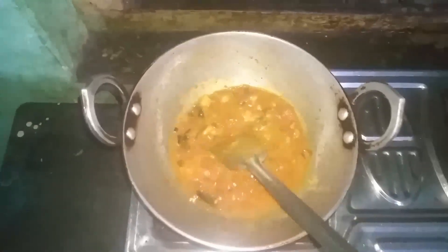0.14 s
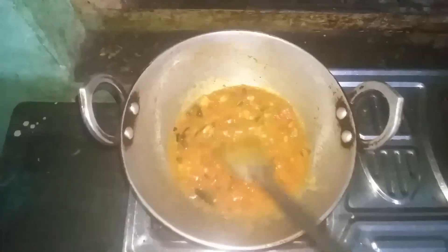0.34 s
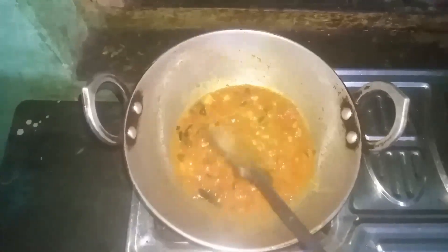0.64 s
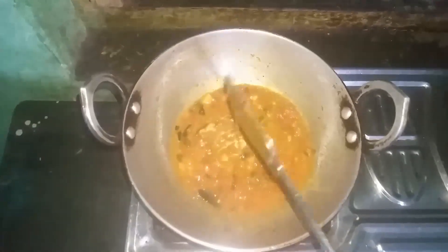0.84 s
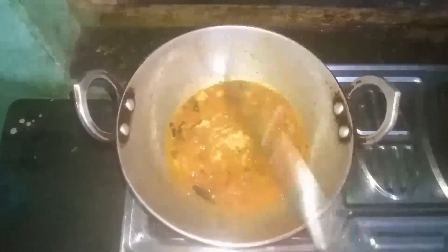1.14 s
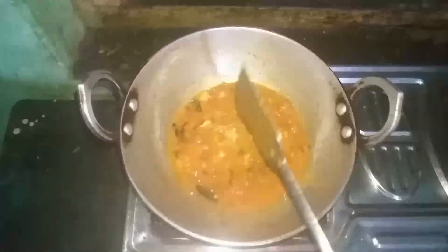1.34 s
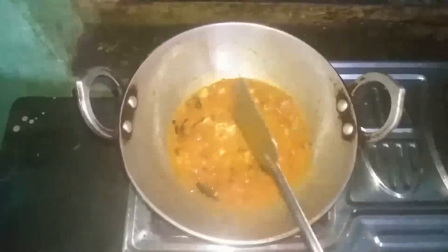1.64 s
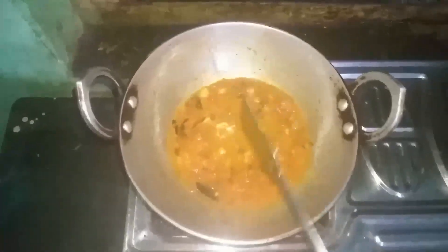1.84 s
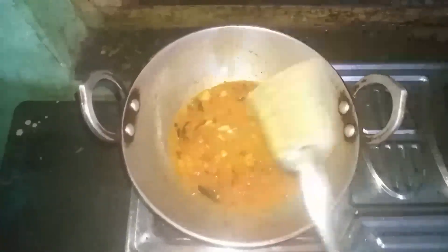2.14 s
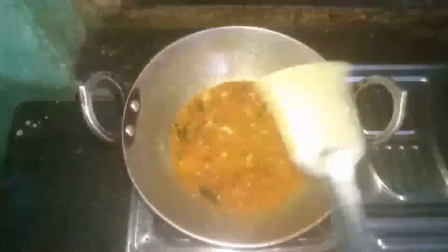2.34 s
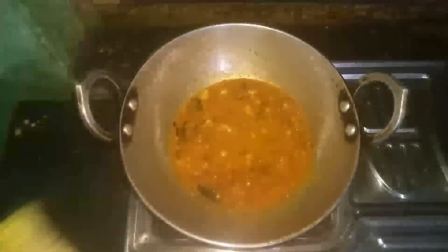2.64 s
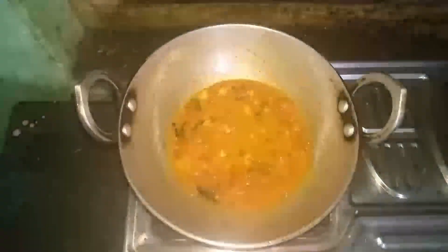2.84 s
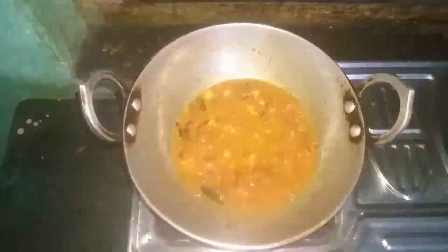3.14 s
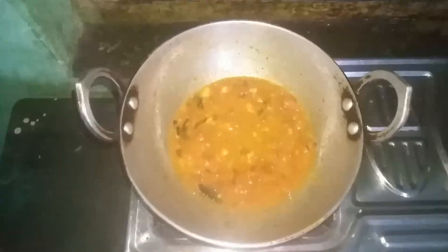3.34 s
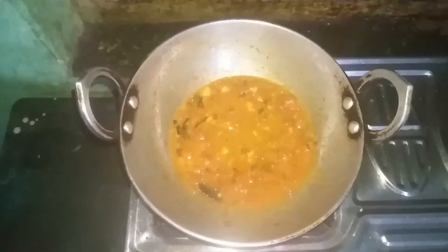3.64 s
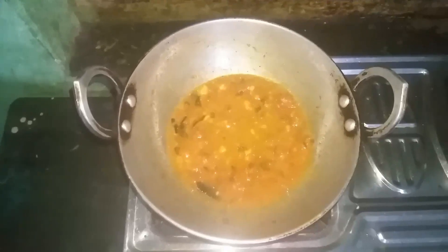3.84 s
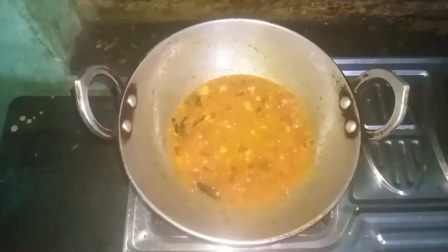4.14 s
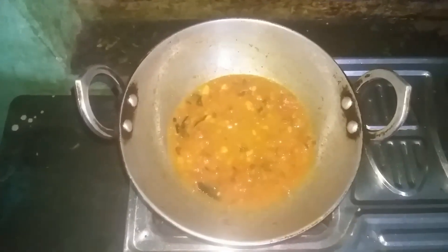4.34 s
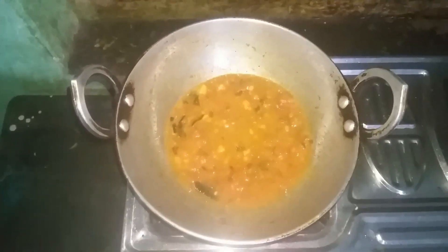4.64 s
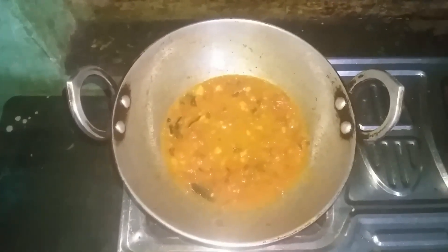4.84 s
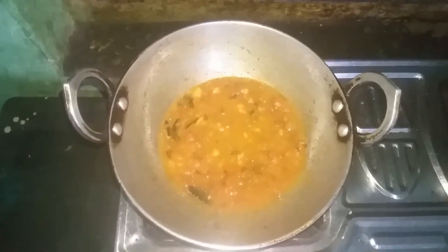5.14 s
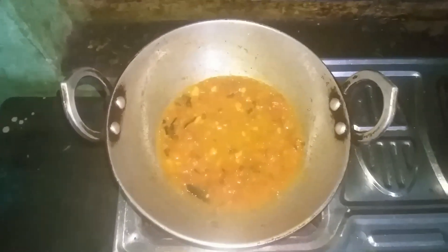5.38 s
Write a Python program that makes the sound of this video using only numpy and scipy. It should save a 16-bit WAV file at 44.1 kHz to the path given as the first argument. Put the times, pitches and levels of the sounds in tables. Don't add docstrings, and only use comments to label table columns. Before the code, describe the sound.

Close above a steel pan in a small hard-walled kitchen, gravy sizzles, crackles and spits fat. A spatula scrapes the pan for the first half second, faint dishes clink far off, then near four seconds the spatula lands on the worktop with a light tap, a very loud clack and a bounce. The simmer grows fuller with soft plops over a steady low motor hum.

```python
import sys
import numpy as np
from scipy import signal
from scipy.fft import rfft, irfft
from scipy.io import wavfile

SR = 44100
rng = np.random.default_rng(int(sys.argv[2]) if len(sys.argv) > 2 else 0)


def digitize_waveform(pressure):
    field = np.atleast_2d(pressure).T
    bounded = np.clip(field, -1, 1)
    quanta = np.round(bounded * 32767).astype(np.int16)
    wavfile.write(sys.argv[1], SR, quanta)


def gain_from_db(level_db):
    decades = np.asarray(level_db, float) / 20
    return 10 ** decades


N = 242991

# time in seconds, sizzle level in dB.
VIGOUR = [(0, -46.5), (.38, -51.5), (.8, -55.5), (1.1, -51.5), (1.5, -52.5), (1.65, -49.5), (2.04, -47),
          (2.73, -48.5), (3.3, -47.5), (3.9, -45.5), (4.5, -44.5), (4.9, -45), (5.3, -43.5), (5.51, -46.5)]
# frequency in Hz, density in dB per Hz.
SIZZLE_SPECTRUM = [(710, -52), (1200, -48), (1430, -47), (1590, -14.5), (2010, -9), (3060, 3), (3350, -3),
                   (3770, 3), (4120, -1), (4600, 0), (4940, -5), (5410, -3.5), (6550, -9.5), (7780, -8),
                   (10500, -37), (13600, -57), (22000, -120)]
# frequency in Hz, density in dB per Hz.
SPRAY_SPECTRUM = [(8500, -0.5), (9700, -17.5), (10800, -17.5), (12300, -17), (13800, -23), (16000, -22)]
# frequency in Hz, density in dB per Hz.
GURGLE_SPECTRUM = [(240, -32), (400, -16), (600, -12), (974, -6), (1260, -10), (1580, -1.5), (1700, 1),
                   (2210, -19), (3740, -120)]
# middle in seconds, length in seconds, extra level in dB.
GUSTS = [
    (.82, 0.18, 5.5),
    (1.6, 0.37, 5.5),
    (2.46, 0.16, 7.5),
    (2.92, 0.13, 2),
    (3.5, 0.11, 0.5),
    (4.8, 0.19, 0.5),
    (5.45, 0.89, 3.5),
]
# middle in seconds, length in seconds, level in dB.
PLOPS = [
    (3.75, .5, -78),
    (4.485, 1, -60.5),
    (4.816, 0.19, -61),
    (5.09, 0.16, -62),
    (5.397, 0.62, -63),
]
# time in seconds, peak in dB, pitch in Hz, snap level in dB.
SPITS = [(0.0598, -27, 2580, -19), (0.5367, -30.5, 3660, -17), (1.1078, -33, 4600, -18),
         (1.2425, -32, 3000, -26), (1.392, -34, 3920, -12), (1.5267, -29.5, 4060, -14),
         (1.6186, -32, 3880, -12), (1.6993, -32.5, 3800, -15), (1.8466, -25, 3110, -26),
         (2.0034, -32, 2880, -14), (2.038, -26, 3740, -21), (2.2427, -28, 3050, -23),
         (2.39, -27, 3720, -18), (2.4776, -29, 2980, -11), (2.9054, -31, 3890, -15),
         (3.244, -30.5, 4500, -13), (3.3927, -25.5, 3620, -22), (3.4252, -25, 3600, -16),
         (3.5084, -24.5, 3520, -30), (3.5538, -29, 2870, -20), (3.6536, -27, 2920, -21),
         (3.674, -41, 3500, -22), (3.7819, -26.5, 2960, -23), (4.6523, -24, 4230, -21),
         (4.79, -25.5, 3100, -15), (5.0574, -26, 3660, -15), (5.0786, -23.5, 3150, -23),
         (5.3364, -28, 4680, -21), (5.4192, -33, 4320, -21), (5.442, -29, 4520, -15)]
# time in seconds, peak in dB, pitch in Hz.
TICKS = [(0.808, -42, 7200), (1.284, -42, 5530), (1.4117, -39, 7900), (1.4528, -38, 7900),
         (1.5279, -37, 7180), (1.6187, -32, 7900), (1.7123, -36, 7970), (1.8891, -49, 6200),
         (1.924, -41, 7040), (1.9395, -49, 6150), (2.412, -38, 5550), (2.4404, -43, 5460),
         (2.4567, -30, 5700), (2.734, -32, 5570), (2.9058, -46, 7250), (3.4445, -37, 8100),
         (4.5146, -32, 5910), (4.5985, -36.5, 7540), (4.6384, -39, 5500), (4.811, -29.5, 6360),
         (5.057, -36, 5510), (5.355, -39, 5550), (5.4707, -32, 6800)]
# time in seconds, peak in dB, pitch in Hz, 60 dB decay in seconds.
WHEEZES = [
    (3.163, -35, 7700, 0.046),
    (4.765, -36, 6900, .04),
    (5.18, -36, 7600, 0.087),
    (5.44, -30.5, 5200, 0.047),
    (6.6, -36, 4730, 0.031),
    (6.2, -42, 3800, 0.04),
    (.805, -56, 12800, .07),
]
# time in seconds, peak in dB, rattle in dB, softness from 0 to 1.
BLOWS = [(3.8851, -20.5, -30, 0.44), (3.889, -19, -13, 0.17), (3.8945, -21.5, -24, 0.5),
         (4.0848, 0, -42, 1), (4.0868, -6.5, -13.5, 0), (4.0905, -5, -22.5, 0.02),
         (4.0944, -12.5, -29, 0.05), (4.1050, -9.5, -12, 0), (4.2733, -19.5, -35, 0.8),
         (4.2743, -12.5, -22, 0.76), (4.279, -19, -33, .6), (4.2898, -17.5, -22, 0.87),
         (4.292, -10, -30, 1), (4.295, -11.5, -15.5, 0.59), (4.3, -10.5, -21, 0.83),
         (4.3026, -15.5, -20, 0.67), (4.3064, -17.5, -19, 0.6)]
# frequency in Hz, level in dB, 60 dB decay in seconds.
HANDLE_MODES = [(2300, -11, .03), (2700, -7.5, 0.0098), (3050, -10.5, 0.016), (4720, -10, .025),
                (8050, -11, 0.022)]
# frequency in Hz, level in dB, 60 dB decay in seconds.
BLADE_MODES = [(2300, -39, 0.016), (2485, -7, 0.065), (2614, -9.5, 0.029), (2820, -9, 0.011),
               (3095, -5.5, 0.017), (3300, -21, .015), (3700, -22, 0.022), (3974, -9.5, 0.023),
               (4390, -13, 0.023), (4650, -13, 0.023), (5140, -21, .015), (6050, -14, 0.019),
               (7020, -14, 0.028), (7550, -16.5, 0.024)]
# frequency in Hz, density in dB per Hz.
HANDLE_CRACK = [(1300, -37), (1800, -14), (2200, 0), (3000, 1.5), (3600, -17), (4600, 1), (5200, -16),
                (6300, -16), (8100, -7.5), (9600, -38), (10900, -22), (13000, -22), (13800, -48),
                (16000, -45)]
# frequency in Hz, density in dB per Hz.
BLADE_CRACK = [(1300, -18.5), (1600, -21.5), (2100, -19), (2450, -3), (3100, 4), (3550, 4.5), (4000, 6.5),
               (4700, 4.5), (5500, -5.5), (6200, -6), (7300, -4.5), (8500, -3.5), (9600, -22.5),
               (15600, -45)]
# frequency in Hz, density in dB per Hz.
WORKTOP_THUD = [(110, -62), (190, -20), (238, 2), (345, 0), (654, -11), (1180, -7), (1280, 2.5),
                (1500, -37), (1950, -35), (3300, -120)]
# time in seconds, level in dB.
SCRAPE_LEVEL = [(0, -52), (.05, -50), (.075, -46), (.16, -46.5), (.3, -52), (.42, -55), (.55, -64)]
# frequency in Hz, width in Hz, level in dB.
PAN_MODES = [(114, 12, -2), (400, 89, -8), (473, 97, -11), (1150, 58, -11), (1247, 54, -5),
             (1570, 70, -6.5), (1870, 110, -6), (2130, 52, 5), (2484, 60, 0.5), (2490, 55, 3)]
# frequency in Hz, density in dB per Hz.
RUMBLE_SPECTRUM = [(12, -60), (20, -33), (64, -38), (101, -14.5), (127, -17.5), (157, -10.5), (184, -19),
                   (212, -15), (274, -17.5), (330, -15), (359, -21), (397, -30.5), (600, -36), (780, -70),
                   (1320, -120)]
# start in seconds, end in seconds, frequency in Hz, level in dB.
CLINKS = [
    (0.71, 0.82, 1740, -65.5),
    (.86, 1.05, 1670, -68.5),
    (1.092, 1.293, 1203, -62.5),
    (1.18, 1.275, 737, -76),
    (1.364, 1.462, 1690, -61.5),
    (1.417, 1.6, 1636, -65),
    (1.37, 1.503, 1580, -65),
    (1.446, 1.66, 1176, -67),
    (1.462, 1.64, 1060, -72),
    (2.43, 2.65, 1612, -64.5),
]
# frequency in Hz, 60 dB decay in seconds.
ROOM_DECAY = [(300, 1), (2500, 0.43), (6000, 0.79), (12000, 0.22)]


def rms_one(x):
    return x / np.sqrt(np.mean(x ** 2) + 1e-20)


def in_time(rows):
    s, *columns = np.transpose(rows)
    return [np.interp(np.arange(N) / SR, s, c, right=c[-1] if s[-1] > 5 else -120) for c in columns]


def at_hz(points, hz):
    table = np.array(points)
    return np.interp(np.log(hz), np.log(table[:, 0]), table[:, 1])


def swells(rows):
    t = np.arange(N) / SR
    return sum(height * np.cos(np.pi * np.clip((t - s) / length, -.5, .5)) ** 2 for s, length, height in rows)


def colour(x, spectrum):
    hz = np.maximum(np.arange(4097) * SR / 8192, 5)
    low, high = spectrum[0][0], spectrum[-1][0]
    outside_octaves = np.abs(np.log2(hz / np.clip(hz, low, high)))
    cepstrum = irfft(np.log(gain_from_db(at_hz(spectrum, hz) - 24 * outside_octaves)))
    cepstrum[1:4096] *= 2
    cepstrum[4097:] = 0
    response = irfft(np.exp(rfft(cepstrum)))
    return signal.fftconvolve(x, response / np.sqrt(np.sum(response ** 2)))[:N]


def drift(rate):
    r = np.exp(-40 * np.pi * rate / SR)
    slow = signal.lfilter([1], [1, -2 * r, r * r], rng.standard_normal(N // 20 + 4002))[4000:]
    return np.interp(np.arange(N) / 20, np.arange(len(slow)), rms_one(slow))


def ring(clicks, hz, t60):
    r, w = gain_from_db(-60 / (t60 * SR)), 2 * np.pi * hz / SR
    return signal.lfilter([0, np.sin(w)], [1, -2 * r * np.cos(w), r * r], clicks + 1e-18)


def clicks_at(times, heights):
    out = np.zeros(N)
    out[np.round(np.asarray(times) * SR).astype(int)] = heights
    return out


def bursts(per_s, spread_db, clump_db):
    sizes = gain_from_db(spread_db * np.minimum(rng.exponential(1, N), 5)) * rng.choice([-1, 1], N)
    return sizes * (rng.random(N) < per_s * gain_from_db(clump_db * drift(25.0)) / SR)


def bubbles(low_hz, high_hz, per_s, cycles, spread_db):
    clicks, dealt = bursts(per_s, spread_db, 3.0), rng.integers(0, 24, N)
    pitches = np.geomspace(low_hz, high_hz, 24)
    return rms_one(sum(ring(clicks * (dealt == k), hz, cycles / hz) * hz for k, hz in enumerate(pitches)))


def simmer():
    sizzle_db, gust_db = in_time(VIGOUR)[0], swells(GUSTS)
    swing_db = sizzle_db + 50
    thick = np.clip((np.arange(N) / SR - 3.2) / .4, 0, 1)
    fizz_db = -60 + 0.47 * swing_db + 0.94 * gust_db
    spray_db = -65 + 0.92 * swing_db + gust_db
    gurgle_db = -70 + 0.84 * swing_db + 5 * thick
    crackle = rms_one(bursts(900.0, 4.6, 2.5))
    steam = rng.standard_normal((3, N))
    mix = bubbles(1244, 11000, 3500.0, 11.0, 3.3) + gain_from_db(-20.0) * crackle + gain_from_db(2.0) * steam[0]
    mix = mix + gain_from_db(-11.5) * bubbles(1992, 9030, 500.0, 80.0, 2.0)
    pan = colour(mix, SIZZLE_SPECTRUM)
    sizzle = signal.sosfiltfilt(signal.butter(2, 5500, fs=SR, output="sos"), pan)
    spray = colour(steam[1] + gain_from_db(-9) * crackle, SPRAY_SPECTRUM)
    gurgle = colour(steam[2] + gain_from_db(-20.0) * crackle, GURGLE_SPECTRUM)
    flicker_db = 1.47 * drift(17.0)
    large = gain_from_db(sizzle_db + flicker_db) * rms_one(sizzle)
    small = gain_from_db(fizz_db + flicker_db) * rms_one(pan - sizzle)
    fine = gain_from_db(spray_db + 1.8 * drift(36.0)) * rms_one(spray)
    low = gain_from_db(gurgle_db + 1.2 * drift(11.0)) * rms_one(gurgle)
    return large + small + fine + low


def plops():
    hollow = bubbles(800, 1100, 400.0, 30.0, 3.3)
    spells = swells([(s, length, gain_from_db(level_db)) for s, length, level_db in PLOPS])
    return spells * signal.sosfilt(signal.butter(2, [650, 1300], "band", fs=SR, output="sos"), hollow)


def spits():
    rows, out = np.array(SPITS), np.zeros(N)
    t, decay_cycles = np.arange(900) / SR, 23
    for s, peak_db, hz, _ in rows:
        at = round(s * SR)
        envelope = gain_from_db(-60 * t * hz / decay_cycles) * (1 - np.exp(-t / 0.00011))
        shape = np.sin(2 * np.pi * hz * t) * envelope
        out[at:at + 900] += (gain_from_db(peak_db + 0.5) * shape)[:N - at]
    out = signal.sosfilt(signal.butter(4, 1500, "high", fs=SR, output="sos"), out)
    snaps = clicks_at(rows[:, 0], gain_from_db(rows[:, 1] + 19 + rows[:, 3]))
    return out + colour(snaps, SIZZLE_SPECTRUM)


def ticks():
    out, t = np.zeros(N), np.arange(3000) / SR
    droplets = [(s, db - 1.5, hz, 0.0045) for s, db, hz in TICKS]
    for s, peak_db, hz, t60 in droplets + list(WHEEZES):
        at = round(s * SR)
        swell = 1 - np.exp(-t / (0.1 * t60))
        puff = rng.standard_normal(3000) * swell * gain_from_db(-60 * t / np.clip(t60, .001, .09))
        shape = ring(puff, hz, 37.0 / hz)
        out[at:at + 3000] += (gain_from_db(peak_db) * shape / np.abs(shape).max())[:N - at]
    return signal.sosfilt(signal.butter(2, [3000, 11500], "band", fs=SR, output="sos"), out)


def spatula():
    contact, rattle, t = np.zeros(N), np.zeros(N), np.arange(12000) / SR
    chatter_t60_s, rattle_t60_s = 0.012, 0.29
    for s, peak_db, rattle_db, soft in BLOWS:
        at, share = round(s * SR), np.clip(soft, 0, .9)
        dull = signal.lfilter([1 - share], [1, -share], rng.standard_normal((2, 12000)))
        chatter = gain_from_db(peak_db - 60 * t / chatter_t60_s) * (1 - np.exp(-t / 0.00038))
        contact[at:at + 12000] += chatter * dull[0]
        rattle[at:at + 12000] += gain_from_db(peak_db + rattle_db - 60 * t / rattle_t60_s) * dull[1]
    s, peak_db, _, soft = np.transpose(BLOWS)
    first, struck = np.arange(N) < 4 * SR, 0
    for modes, part in (HANDLE_MODES, first), (BLADE_MODES, ~first):
        for hz, level_db, t60 in modes:
            softened_db = 45 * soft * np.log2(max(hz / 3300, 1))
            strikes = clicks_at(s, gain_from_db(peak_db + 3 * rng.standard_normal(len(s)) - softened_db))
            drive = part * (signal.lfilter([.5, .5], 1, strikes) + gain_from_db(-15.5) * rattle)
            struck = struck + gain_from_db(level_db) * ring(drive, hz, np.clip(t60, .008, .035))
    struck = signal.sosfilt(signal.butter(6, 2200, "high", fs=SR, output="sos"), struck)
    struck = struck + gain_from_db(-30) * ring(~first * (contact + gain_from_db(-6) * rattle), 2470, .25) / 10
    dense = contact + gain_from_db(-1.5) * rattle
    crack = colour(dense * first, HANDLE_CRACK) + colour(dense * ~first, BLADE_CRACK)
    worktop = gain_from_db(-29.0) * colour(gain_from_db(-5.5) * contact + gain_from_db(4.5) * rattle, WORKTOP_THUD)
    return struck + crack + worktop


def scrape():
    slips, out = bursts(5000.0, 1.7, 2.0), 0
    for hz, width_hz, level_db in PAN_MODES:
        out = out + gain_from_db(level_db) * rms_one(ring(slips, hz, 2.2 / width_hz))
    return gain_from_db(in_time(SCRAPE_LEVEL)[0] - 2.5) * rms_one(out)


def motor():
    turn = 2 * np.pi * np.cumsum(159.0 + 0.17 * drift(3.4)) / SR
    tone = gain_from_db(-46 + 0.33 * drift(27.0) + 0.29 * drift(6.0)) * np.sin(turn)
    shaft = gain_from_db(-75.5 + 5.5 * drift(3.9)) * np.sin(turn / 3)
    rumble = rms_one(colour(rng.standard_normal(N), RUMBLE_SPECTRUM))
    shaken_db = 6.5 * np.exp(-np.arange(N) / SR / .12)
    return tone + shaft + gain_from_db(-62 + shaken_db + 0.85 * drift(24.0)) * rumble


def far_clinks():
    t, out = np.arange(N) / SR, 0
    for start, end, hz, level_db in CLINKS:
        shape = np.sin(np.pi * np.clip((t - start) / (end - start), 0, 1) ** 0.72)
        blur = rms_one(ring(rng.standard_normal(N), hz, 0.018))
        out = out + gain_from_db(level_db) * shape * (np.sin(2 * np.pi * hz * t) + 0.55 * blur)
    return out


def kitchen(x):
    t, tail = np.arange(SR // 2) / SR, 0
    for low in 125 * 2. ** np.arange(7):
        octave = signal.butter(2, [low, 2 * low], "band", fs=SR, output="sos")
        band = signal.sosfilt(octave, rng.standard_normal(len(t)))
        tail = tail + band * gain_from_db(-60 * t / at_hz(ROOM_DECAY, 1.13 * low))
    tail = tail * (1 - np.exp(-t / 0.0013))
    return signal.fftconvolve(x, tail / np.sqrt(np.sum(tail ** 2)))[:N]


def scene():
    blade, pan = spatula(), spits() + ticks()
    near = simmer() + plops() + pan + blade + scrape()
    echo = kitchen(gain_from_db(-6.5) * blade + gain_from_db(-3.5) * pan)
    mid = near + echo + far_clinks() + motor()
    return np.array([mid, mid])


def top_cut(x):
    return signal.sosfilt(signal.butter(12, 16550, fs=SR, output="sos"), x)


def record(dry):
    treble = signal.butter(2, 9000, "high", fs=SR, output="sos")
    hiss = signal.sosfilt(treble, rng.standard_normal(N))
    corners_s = 4.26 + np.cumsum([0, 0.29, 0.65, 0.14])
    gain = gain_from_db(np.interp(np.arange(N) / SR, corners_s, [0, -2.5, -2.5, 0]))
    mid = gain * dry.mean(axis=0) + gain_from_db(-95) * hiss
    dip = signal.sosfiltfilt(signal.butter(2, [1450, 2300], "band", fs=SR, output="sos"), mid)
    upper = signal.sosfilt(signal.butter(2, [2300, 15000], "band", fs=SR, output="sos"), mid)
    top = signal.sosfilt(signal.butter(2, 7000, "high", fs=SR, output="sos"), mid)
    air = signal.sosfilt(signal.butter(2, 70, fs=SR, output="sos"), rng.standard_normal(N))
    side = gain_from_db(-11.5) * dip + gain_from_db(-28.5) * np.roll(upper, 3) + gain_from_db(-34.5) * top + gain_from_db(-67) * air
    both = 1.1 * np.tanh((mid + side * [[1], [-1]]) / 1.25)
    both = signal.sosfilt(signal.ellip(10, .5, 55, 15750, fs=SR, output="sos"), both)
    return top_cut(both)


dry = scene()
out = record(dry)
digitize_waveform(out)
```